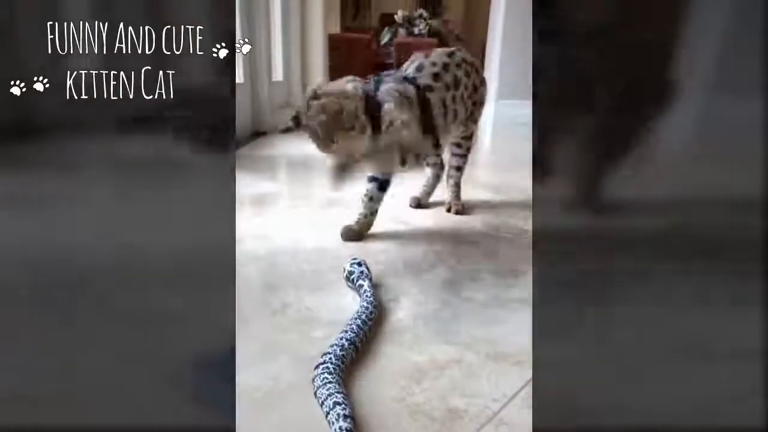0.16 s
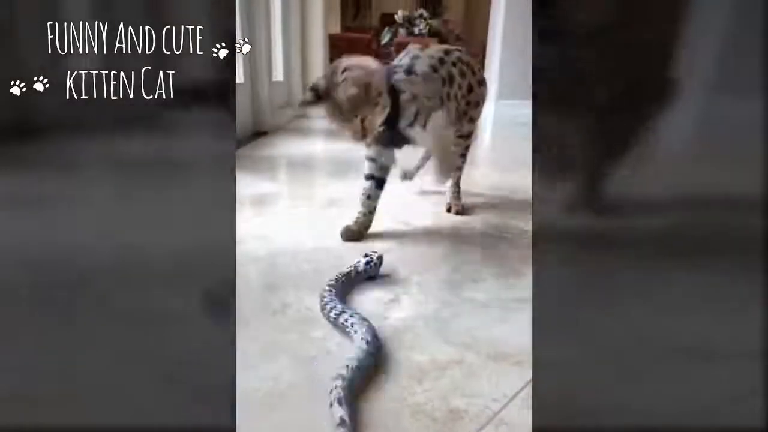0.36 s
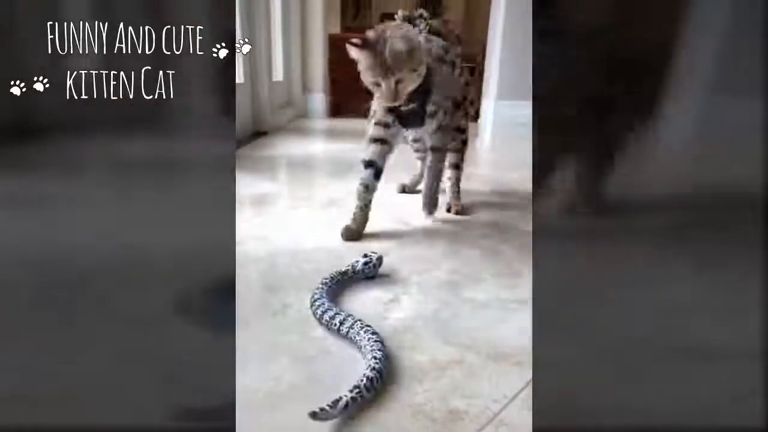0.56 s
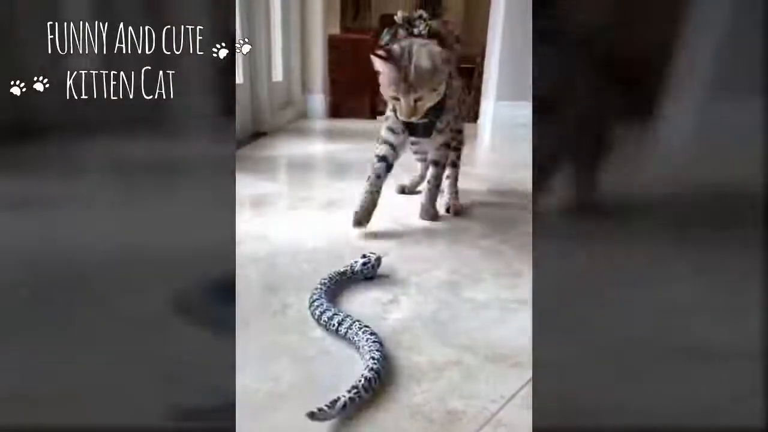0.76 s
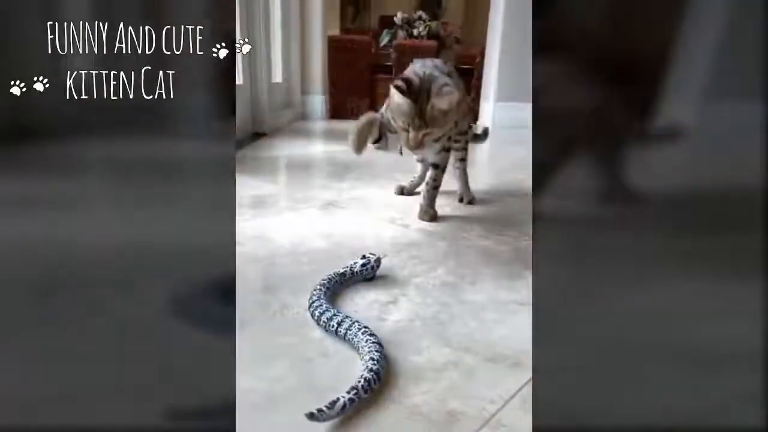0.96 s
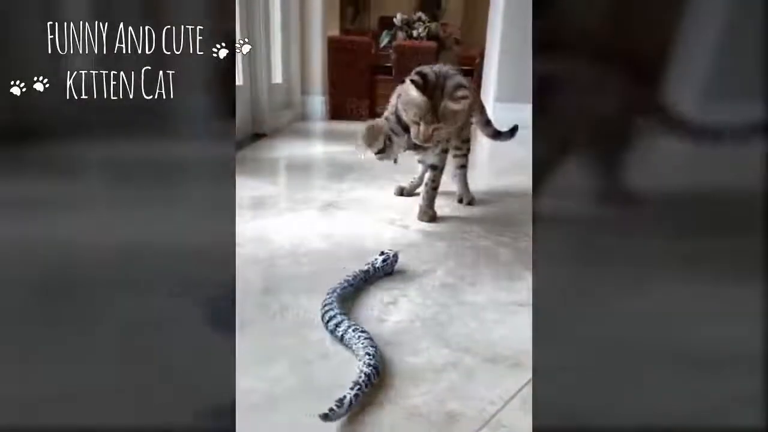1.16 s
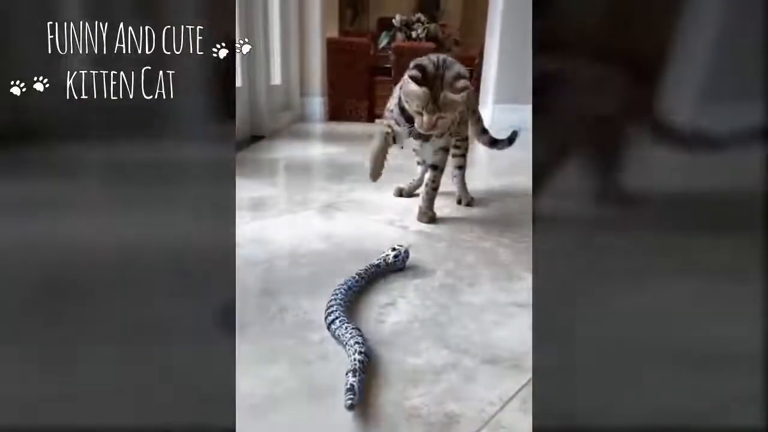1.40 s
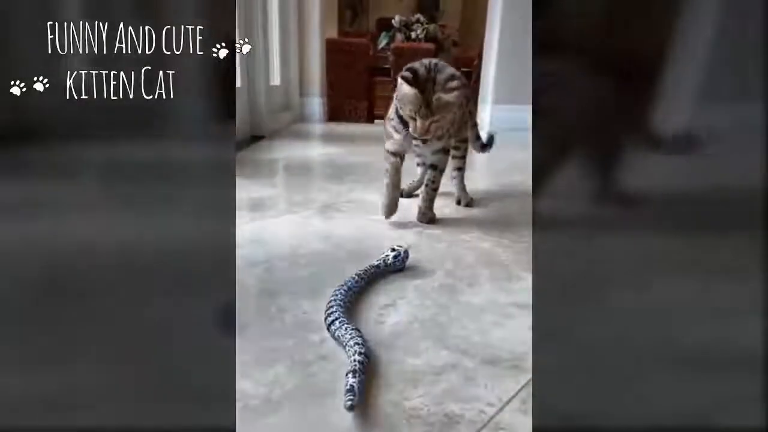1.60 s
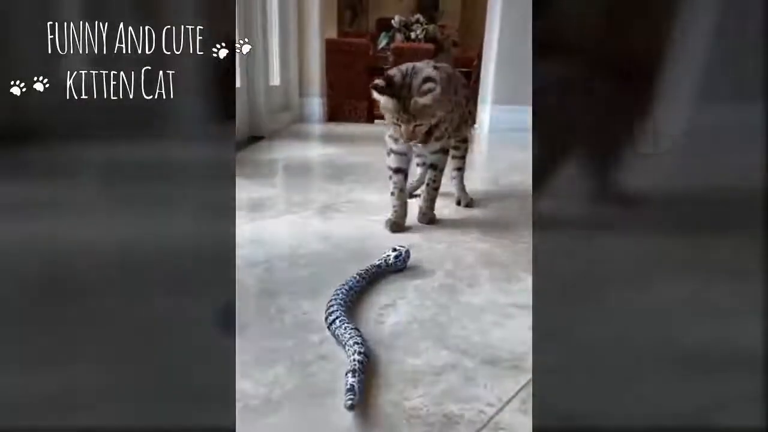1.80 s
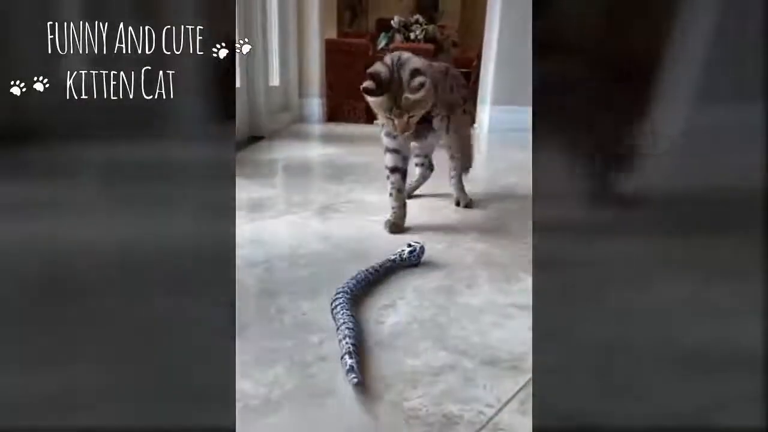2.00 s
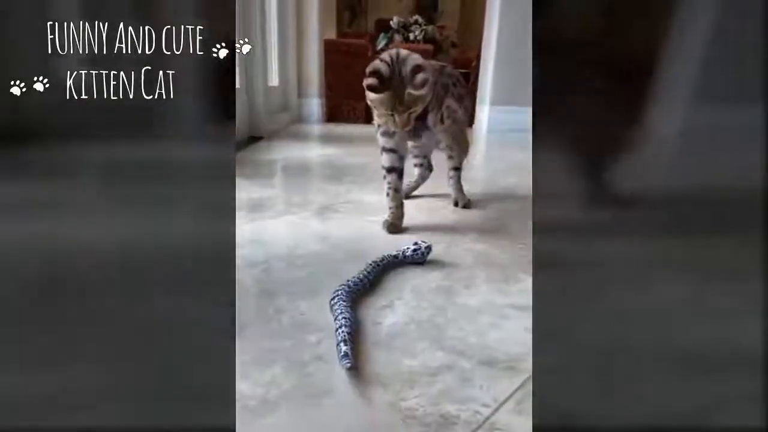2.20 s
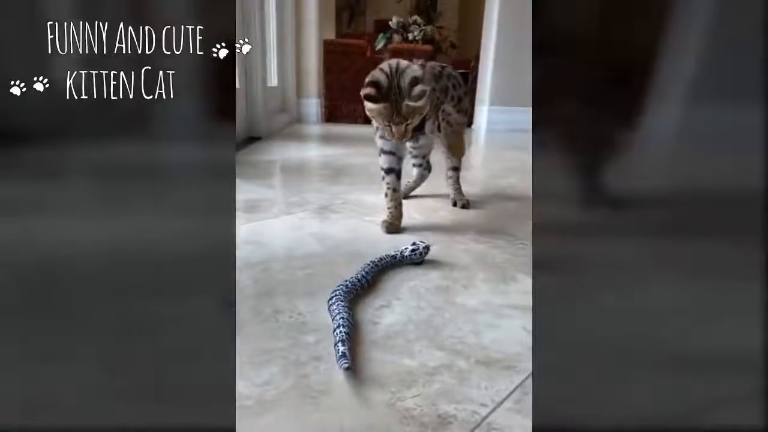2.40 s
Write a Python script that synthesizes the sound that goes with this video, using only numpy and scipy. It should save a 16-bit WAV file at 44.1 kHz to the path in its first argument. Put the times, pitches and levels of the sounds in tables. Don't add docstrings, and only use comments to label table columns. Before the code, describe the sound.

Plastic toy snake clatters on a hard floor, with sharp nearby remote clicks and short whirring rattles.

```python
import sys
import numpy as np
from scipy import signal
from scipy.fft import rfft, irfft
from scipy.io import wavfile

SR = 44100
rng = np.random.default_rng(int(sys.argv[2]) if len(sys.argv) > 2 else 0)


def to_linear_factor(level_db):
    exponent = np.asarray(level_db, float) / 20
    return 10 ** exponent


def waveform_to_disk(signal):
    frames = np.transpose(np.atleast_2d(signal))
    scaled = np.clip(frames, -1, 1) * 32767
    samples = np.round(scaled).astype(np.int16)
    wavfile.write(sys.argv[1], SR, samples)


N = 105840

# (time [s], level [dB])
SKID_LEVEL = [
    (.196, -66),
    (.2, -36.5),
    (.212, -24),
    (.222, -43),
    (.242, -45.5),
    (.25, -30.5),
    (.283, -32),
    (.31, -40),
    (.325, -24),
]


def in_time(rows):
    s, db = np.transpose(rows)
    return to_linear_factor(np.interp(np.arange(N) / SR, s, db, left=-200, right=-200))


def at_hz(points, hz):
    table_hz, value = np.transpose(points)
    return np.interp(np.log(hz + 1), np.log(table_hz), value)


def rms_one(x):
    return x / np.sqrt(np.mean(x ** 2) + 1e-20)


def high_pass(x, hz, order):
    return signal.sosfilt(signal.butter(order, hz, "high", fs=SR, output="sos"), x)


def coloured(x, points):
    gain = to_linear_factor(at_hz(points, np.linspace(0, SR / 2, 4097)))
    ceps = irfft(np.log(gain))
    ceps[1:4096] *= 2
    taps = irfft(np.exp(rfft(ceps[:4096], 8192)))[:4096]
    return signal.fftconvolve(x, taps / np.linalg.norm(taps))[:len(x)]


def ring(x, hz, t60):
    r = to_linear_factor(-60 / (t60 * SR))
    w = 2 * np.pi * hz / SR
    return signal.lfilter([0, np.sin(w)], [1, -2 * r * np.cos(w), r * r], x + 1e-18)


def peak(x, hz, width_hz):
    r = np.exp(-np.pi * width_hz / SR)
    w = 2 * np.pi * hz / SR
    return signal.lfilter([(1 - r * r) / 2, 0, (r * r - 1) / 2], [1, -2 * r * np.cos(w), r * r], x)


def struck(x, hz, t60):
    return np.e * peak(ring(x, hz, t60), hz, np.log(1000) / (np.pi * t60))


def clicks(s, db):
    out = np.zeros(N)
    np.add.at(out, (np.asarray(s) * SR).astype(int), to_linear_factor(db))
    return out


def dying(x, length_s):
    return signal.lfilter([1], [1, -np.exp(-1 / (length_s * SR))], x + 1e-18)


def swelling(x, length_s):
    return dying(dying(x, length_s), length_s) * np.e / (length_s * SR)


def hum():
    # (frequency [Hz], density [dB per Hz])
    hum_colour = [(15, -28.5), (25, 8), (195, -12.5), (339, -14.5), (604, -22), (1140, -23), (1920, -26),
                  (2640, -27), (13500, -43.5)]
    bed = rms_one(coloured(rng.standard_normal(N + SR), hum_colour)[SR:])
    line = rms_one(peak(rng.standard_normal(N), 247, 8))
    return to_linear_factor(-60) * bed + to_linear_factor(-79) * line


def hall(x):
    # (frequency [Hz], decay time [s])
    hall_decay = [(500, 0.76), (2000, 0.6), (4000, 0.6), (8000, 0.37), (13000, 0.22)]
    gap_s = 0.0013
    places, place_s = 8, 0.005
    t = np.arange(SR) / SR
    edges = 100 * 2 ** np.arange(0, 7.6, 0.5)
    white = rng.standard_normal((2, places, SR))
    tail = 0
    for k, (low, high) in enumerate(zip(edges, edges[1:])):
        band_pass = signal.butter(2, [low, high], "band", fs=SR, output="sos")
        band = signal.sosfilt(band_pass, white[k % 2])
        tail = tail + band * to_linear_factor(-60 * t / at_hz(hall_decay, np.sqrt(low * high)))
    tail = tail * (1 - np.exp(-(t / gap_s) ** 2))
    step = (np.arange(N) / (SR * place_s) - np.arange(places)[:, None] + 1) % places - 1
    share = np.cos(np.pi / 2 * np.clip(step, -1, 1))
    return signal.fftconvolve(share * x, tail / np.linalg.norm(tail[0]), axes=1)[:, :N].sum(axis=0)


def paw():
    start_s, length_s = 0.2, 0.0085
    u = np.maximum(np.arange(N) / SR - start_s, 0) / length_s
    hz = 68 + (220 - 68) * np.exp(-u)
    return to_linear_factor(-45) * np.e * u * np.exp(-u) * np.sin(2 * np.pi * np.cumsum(hz) / SR)


def finger_brush():
    puff = swelling(clicks([0.0945], -37), 0.0015)
    return peak(puff * rng.standard_normal(N), 3490, 4300)


def spring():
    # (time [s], level [dB], frequency [Hz], width [Hz], length [s])
    after_rings = [
        (.908, -50, 2140, 90, .014),
        (.912, -57, 4150, 250, .01),
        (1.622, -57, 4400, 150, .016),
        (1.645, -61, 4580, 150, .025),
    ]
    noise = rng.standard_normal(N)
    out = 0
    for s, db, hz, width, length in after_rings:
        out = out + dying(clicks([s], db), length) * rms_one(peak(noise, hz, width))
    return out


def button_release():
    # (time [s], peak level [dB], brightness [dB])
    letting_go = [
        (0.0941, -47.5, 9.5),
        (1.071, -32.5, 1),
        (1.9545, -32, 2),
    ]
    # (frequency [Hz], level [dB], decay time [s])
    case_modes = [(707, 0, 0.013), (970, -11, 0.025), (1442, -11, 0.01), (1706, -3.5, 0.017),
                  (1980, 2, 0.0088)]
    # (frequency [Hz], level [dB], decay time [s])
    bright_modes = [(3003, -8.5, 0.015), (3710, -10, 0.012), (4160, -6.5, .008), (5600, 2, 0.012),
                    (7100, 2.5, 0.0017), (8440, -11, 0.0045), (9900, -9.5, 0.0032)]
    s, db, bright_db = np.transpose(letting_go)
    body = sum(to_linear_factor(d) * struck(clicks(s, db), hz, t60) for hz, d, t60 in case_modes)
    top = clicks(s, db + bright_db - 9)
    return body + sum(to_linear_factor(d) * struck(top, hz, t60) for hz, d, t60 in bright_modes)


def button_press():
    # (time [s], peak level [dB])
    snaps = [
        (0.9042, -16),
        (1.6155, -17),
    ]
    # (frequency [Hz], first press level [dB], second press level [dB], decay time [s])
    dome_modes = [(708, -15, -15, 0.0095), (990, -20, -21, 0.013), (1477, -19.5, -17.5, 0.011),
                  (1900, -10, -9.5, 0.0068), (3220, -49, -5, 0.005), (4440, -6, -1, 0.0086),
                  (6200, 4, 2.5, 0.0021), (7020, -12, -11, 0.0083), (8500, -5, -5, 0.0019),
                  (9150, -25, -18, 0.0053), (11140, -18, -22.5, 0.0041), (12650, -27, -17, 0.003),
                  (15300, -11, 3, 0.0017)]
    s, db = np.transpose(snaps)
    out = 0
    for hz, *level_db, t60 in dome_modes:
        hit = clicks(s, db + level_db - 4)
        if hz > 5500:
            hit = hit - clicks(s + 0.0016, db + level_db - 10)
        sign = -1 if hz < 850 else 1
        out = out + sign * struck(hit, hz, t60)
    crack_db = db - 24.5
    lead_tick = clicks(s - 0.0015, crack_db - 10)
    burst = dying(clicks(s, crack_db) + lead_tick, 0.0044) * rng.standard_normal(N)
    out = out + high_pass(burst, 3800, 2)
    rustle = swelling(clicks(s + 0.012, db - 49), 0.014) * rng.standard_normal(N)
    out = out + peak(rustle, 5000, 5000)
    return out - 0.88 * peak(out, 3100, 1400)


def swipe():
    # (frequency [Hz], density [dB per Hz])
    skid_colour = [(240, -60), (400, -34), (1060, -17), (1240, -49.5), (1600, -10.5), (2710, 2.5),
                   (8060, -5.5), (12500, -16), (13500, -29.5)]
    # (frequency [Hz], width [Hz], level [dB])
    skid_rings = [(2440, 290, 6.5), (3740, 400, -6), (4210, 460, 0), (5570, 340, -12)]
    # (time [s], peak level [dB], length [s])
    slap_hits = [
        (.3265, -5, .0009),
        (.3283, -14, .003),
        (.3325, -9, .001),
        (.316, -24, .004),
        (.434, -36, .004),
        (1.46, -54, .005),
    ]
    # (frequency [Hz], density [dB per Hz])
    slap_colour = [(240, -62.5), (400, -35.5), (1800, -20), (2480, -5.5), (3100, -10), (3700, -8.5),
                   (4160, -10), (9480, -8), (13500, -22)]
    rough = to_linear_factor(2.5 * rms_one(dying(rng.standard_normal(N), 0.0039)))
    rub = coloured(in_time(SKID_LEVEL) * rough * rng.standard_normal(N), skid_colour)
    rings = sum(to_linear_factor(db) * peak(rub, hz, width) for hz, width, db in skid_rings)
    rub = 0.83 * rub + 0.5 * rings
    blow = swelling(clicks([0.199], -34.5), 0.0037) * rng.standard_normal(N)
    blow = peak(blow, 1650, 970)
    slap = sum(dying(clicks([s], db - 4.5), length) for s, db, length in slap_hits)
    slap = coloured(slap * rng.choice([-1., 1.], N), slap_colour)
    return rub + 4 * blow + slap


def tinks():
    # (time [s], peak level [dB], frequency [Hz], decay time [s])
    touches = [(0.43, -38.5, 2760, 0.015), (.953, -40, 4900, 0.0091), (1.1115, -29.5, 3950, 0.021),
               (1.715, -40, 2480, 0.0065), (1.8205, -31.5, 2380, 0.011), (2.064, -42.5, 3100, 0.012),
               (2.02, -48, 2750, 0.0087), (2.03, -39, 2960, 0.008), (1.1465, -25.5, 7600, 0.0076),
               (1.5, -36.5, 9200, .005)]
    return sum(struck(clicks([s], db), hz, t60) for s, db, hz, t60 in touches)


def rattle():
    # (time [s], peak level [dB])
    first_knocks = [(0.9404, -33.3), (0.9541, -33.1), (0.9691, -34.9), (0.9865, -28.0), (0.9945, -25.9),
                    (1.0025, -18.5), (1.0084, -24.0), (1.0159, -21.8), (1.0235, -24.3), (1.0457, -19.7),
                    (1.0533, -22.0), (1.0679, -22.7), (1.0753, -22.8), (1.0819, -20.8), (1.0928, -22.8),
                    (1.0998, -25.4), (1.1134, -23.0), (1.1208, -28.0), (1.1263, -28.8), (1.133, -24.4),
                    (1.1464, -18.1), (1.1517, -25.2), (1.1577, -22.1), (1.167, -23.9), (1.1906, -28.2),
                    (1.1954, -24.3), (1.203, -21.9), (1.2105, -20.8), (1.216, -24.1)]
    # (time [s], peak level [dB])
    second_knocks = [(1.7177, -37), (1.7326, -40), (1.7514, -34.0), (1.7571, -32.0), (1.7669, -29.6),
                     (1.7738, -26), (1.786, -28.8), (1.7998, -28.6), (1.8066, -27.7), (1.8142, -31.5),
                     (1.8212, -19), (1.8354, -28.5), (1.8476, -28.0), (1.8528, -22.3), (1.8609, -27.8),
                     (1.8752, -27.0), (1.8834, -28.1), (1.8938, -23.8), (1.8996, -26.7), (1.9078, -22.0),
                     (1.9209, -29.2), (1.9283, -24.7), (1.9344, -24.1), (1.9396, -21.4), (1.9472, -22.5),
                     (1.9542, -19.1), (1.9665, -24.2), (1.7785, -25.5)]
    # (time [s], level [dB])
    motor_effort = [
        [(.925, -75), (.94, -46.5), (.98, -45), (1.0, -40), (1.1, -40), (1.14, -45.5), (1.21, -40.5),
         (1.235, -47), (1.29, -69)],
        [(1.69, -76), (1.712, -49), (1.75, -47), (1.77, -42), (1.85, -44), (1.94, -40), (1.975, -43.5),
         (1.99, -42), (2.09, -84)],
    ]
    # (frequency [Hz], width [Hz], knock level [dB], gear whirr level [dB])
    shell_modes = [(1993, 506, -8.5, -12.5), (2494, 330, -2.5, -8.5), (3245, 420, -9.5, -9.5),
                   (3950, 215, 1.5, -3), (4740, 440, -2, -5), (5216, 980, -6, -9.5),
                   (6700, 1630, -12, -12.5), (8590, 660, -2.5, -7), (9290, 820, -6, -11),
                   (9660, 300, -6.5, -8.5), (11300, 1400, -22.5, -19)]
    s, db = np.transpose(list(first_knocks) + list(second_knocks))
    colour = 2 * rng.standard_normal((len(s), len(shell_modes)))
    modes = np.array(shell_modes)
    weight = to_linear_factor(modes[:, 2]) ** 2 * modes[:, 1]
    colour = colour - 10 * np.log10(to_linear_factor(colour) ** 2 @ weight / weight.sum())[:, None]

    ticks_per_s, tick_spread_db = 900, 1.5
    tick_height = to_linear_factor(tick_spread_db * np.minimum(rng.exponential(1, N), 4))
    ticks = (rng.random(N) < ticks_per_s / SR) * tick_height
    effort = sum(in_time(run) for run in motor_effort)
    load = np.minimum(effort / to_linear_factor(-42), 1) ** 0.96
    scrape = to_linear_factor(4)
    whirr = effort * (rms_one(dying(ticks, 0.00059)) + scrape)

    noise = rng.standard_normal(N)
    signs = rng.choice([-1., 1.], N)
    knock_s = 0.0008
    out = 0
    for k, (hz, width, knock_db, whirr_db) in enumerate(shell_modes):
        knocks = swelling(clicks(s - knock_s, db - 4.5 + knock_db + colour[:, k]), knock_s) * signs
        gears = to_linear_factor(whirr_db) * whirr * noise
        if hz < 7500:
            knocks = knocks * load ** 0.6
            gears = gears * load
        out = out + (-1) ** k * to_linear_factor(9.5) * peak(knocks + gears, hz, width)
    under = (to_linear_factor(-31.5) * whirr + to_linear_factor(-25.5) * in_time(SKID_LEVEL)) * noise
    return high_pass(out, 1650, 4) + 4 * peak(under, 320, 500.)


def scene():
    # (frequency [Hz], width [Hz], share lost [1])
    softened_rings = [
        (3980, 480, 0.69),
        (2425, 300, 0.26),
    ]
    toy = rattle() + swipe() + tinks()
    near = button_press() + button_release() + spring() + finger_brush()
    to_walls = toy - sum(share * peak(toy, hz, width) for hz, width, share in softened_rings)
    echoes = hall(to_linear_factor(-7) * to_walls + to_linear_factor(-35) * near)
    return (toy + near + paw() + echoes + hum())[None]


def band_limit(x):
    return signal.sosfilt(signal.butter(12, 16500, fs=SR, output="sos"), x)


def record(dry):
    x = high_pass(dry, 50.4, 4)
    x = x - 0.55 * peak(x, 11300, 1100)
    top_cut = signal.ellip(10, 0.5, 70, 12960, fs=SR, output="sos")
    mix = signal.sosfilt(top_cut, x) + to_linear_factor(-48) * x
    return band_limit(mix)


dry = scene()
out = record(dry)
waveform_to_disk(out)
```